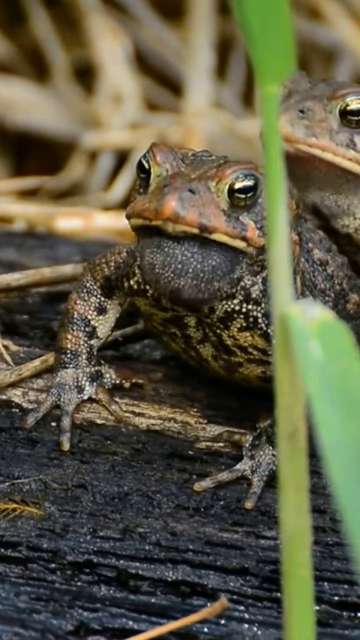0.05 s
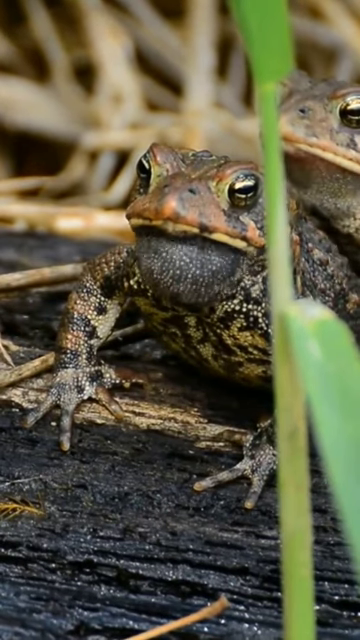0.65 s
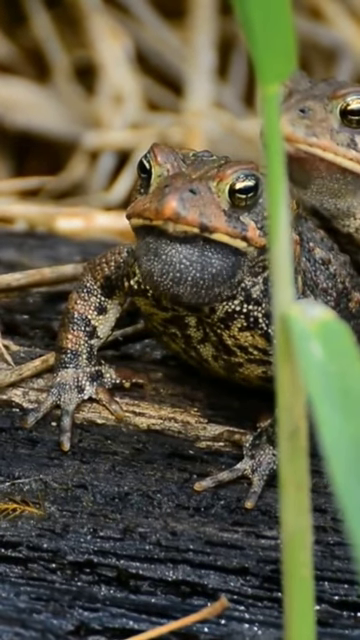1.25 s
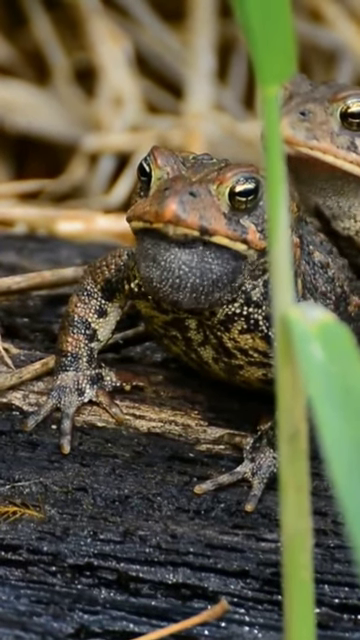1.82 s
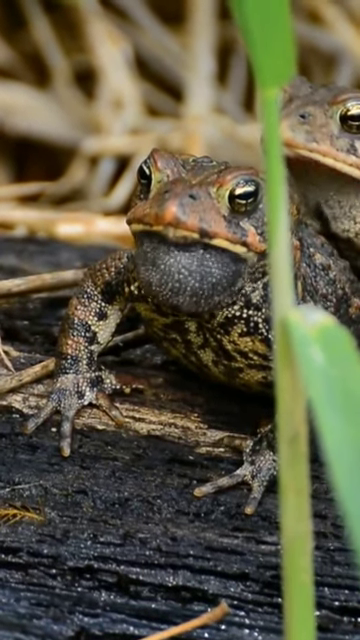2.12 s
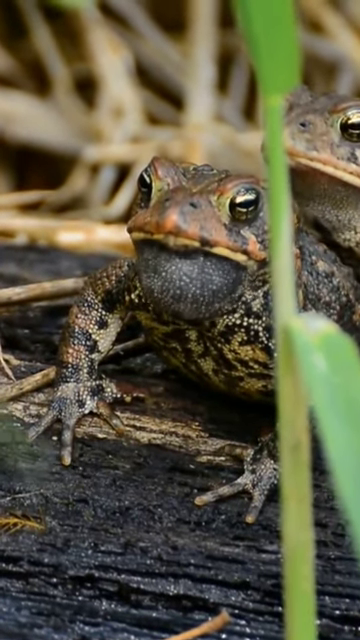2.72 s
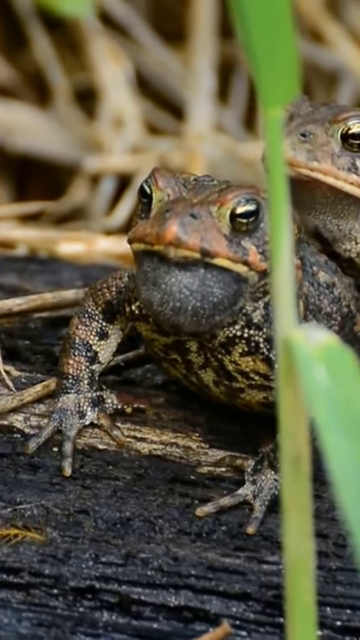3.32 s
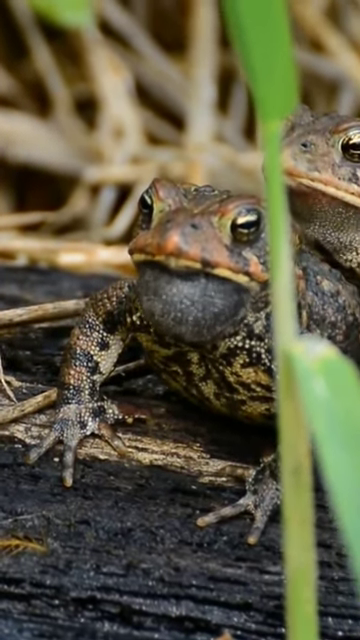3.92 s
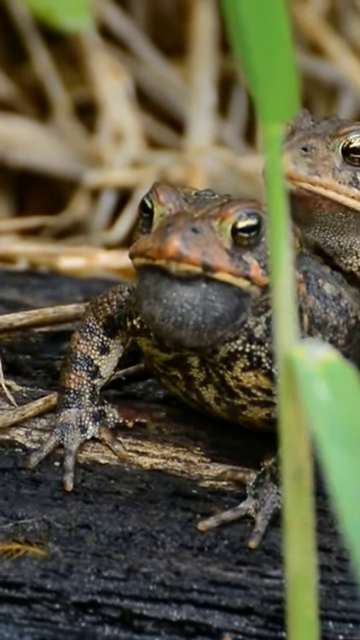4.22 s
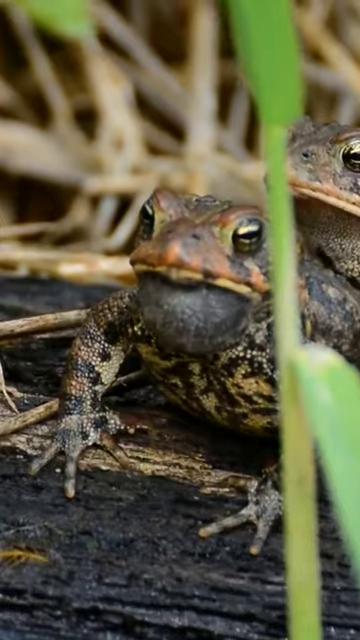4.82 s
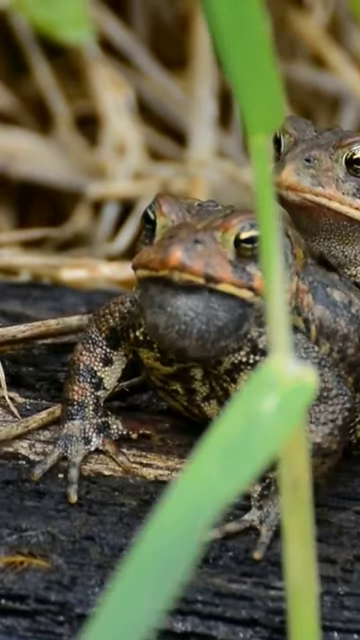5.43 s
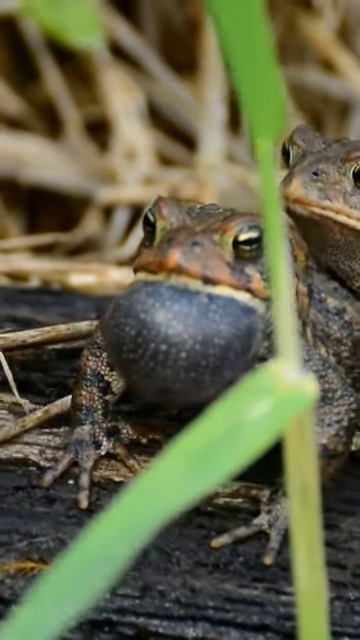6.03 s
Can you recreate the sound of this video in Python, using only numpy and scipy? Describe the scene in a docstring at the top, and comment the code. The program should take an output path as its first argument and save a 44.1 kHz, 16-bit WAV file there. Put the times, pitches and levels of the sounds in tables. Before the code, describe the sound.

Two toads trill together right by the microphone at a pond's edge, in fast, whistling pulses over a soft hiss and a faint distant chorus. The lower one drops out early with a short stutter, while the other carries on, wavering a little before it stops. Wind grows from light puffs to heavy, low buffets that sometimes make the microphone click. Finally a fresh trill climbs in pitch and loudness.

```python
"""Toads trilling in the wind

Two toads call from a log at a pond's edge, very close, each puff of air setting the larynx whistling.
One holds a long trill; a lower neighbour trills along, stops, stutters and finally swells into a new call.
A rising, gusty wind buffets the two microphone ports and now and then overloads them.
A faint chorus and a soft hiss lie far behind."""
import sys
import numpy as np
from scipy import signal
from scipy.fft import rfft, irfft, next_fast_len
from scipy.io import wavfile

SR = 44100
rng = np.random.default_rng(int(sys.argv[2]) if len(sys.argv) > 2 else 0)


def to_wav(s):
    """Save 16-bit WAV."""
    ch = np.atleast_2d(s).T  # columns
    pcm = np.round(np.clip(ch, -1, 1) * 32767)  # PCM
    wavfile.write(sys.argv[1], SR, pcm.astype(np.int16))


N = 271656
TIME = np.arange(N) / SR
LEFT_RIGHT = np.array([[1], [-1]])


# the lead holds steady, hurries twice and runs down: (time [s], pulse rate [Hz])
LONG_RATE = [(0, 41.8), (.25, 41.9), (.38, 40.72), (1.77, 39.54), (2.26, 37.39), (2.54, 38.26),
             (2.96, 44.94), (3.08, 44.34), (3.44, 37.22), (3.9, 34.74), (4.1, 35.82), (4.31, 41.27),
             (4.49, 35.34), (4.66, 33.69), (4.73, 22.28)]
# its pitch sinks slowly, then drops as the air runs out: (time [s], pitch [Hz])
LONG_PITCH = [(0, 1966), (.5, 1958), (3, 1945), (3.35, 1955), (3.8, 1934), (4.6, 1940), (4.73, 1911)]
# its level falters three times: (time [s], level [dB])
LONG_LEVEL = [(0, -6), (1.1, -5), (1.7, -5), (2, -4), (2.8, -4.5), (3, -5.6), (3.15, -5.5), (3.21, -8.5),
              (3.36, -5), (3.57, -4.5), (3.64, -7.5), (3.79, -4), (3.98, -8), (4.2, -8), (4.5, -5),
              (4.73, -3.5)]
# larynx overtones, and rasp from unevenly vibrating membranes: (frequency [x pitch], level [dB])
LONG_OVERTONES = [(2, -34), (3, -44), (3.5, -65.5), (6.5, -62)]
LONG_RASP = [(0.522, -40.5), (0.778, -34), (1.468, -32), (2.492, -48.5), (2.799, -49)]
# the voice smooths out in its second half: (time [s], rasp trim [dB])
LONG_RASP_TRIM = [(0, 0.5), (2.5, 1), (3.1, -0.5), (4.6, -2.5)]


def long_trill():
    """The lead toad spends one breath on a long run of short, even pulses."""
    return trill((.0004, 4.745), *contour(LONG_RATE), *contour(LONG_PITCH), *contour(LONG_LEVEL),
                 LONG_OVERTONES, LONG_RASP, length_s=.014, rise=.28, fall=.3, droop=.55, crest=.42,
                 sag=.105, sac_hold=.6, uneven_db=.46, rasp_trim=LONG_RASP_TRIM)


# the neighbour keeps almost in step with the lead: (time [s], pulse rate [Hz])
NEIGHBOUR_RATE = [(0, 41.22), (1.15, 40.45), (1.42, 37.08), (1.66, 40.26)]
# it sits lower and softer: (time [s], pitch [Hz], level [dB])
NEIGHBOUR_TRILL = [(0, 1806, -11), (.9, 1814, -10), (1.4, 1800, -11.5), (1.66, 1818, -9)]
# its stutter: (time [s], pulse rate [Hz], pitch [Hz], level [dB])
NEIGHBOUR_STUTTER = [(1.835, 23.5, 1490, -19.5), (1.87, 24, 1480, -24), (1.88, 34.3, 1540, -17),
                     (1.92, 39.7, 1700, -12), (2.02, 39.3, 1710, -12), (2.1, 33.7, 1720, -17),
                     (2.15, 45.5, 1712, -12.5)]
# each call's overtones and the rasp they share: (frequency [x pitch], level [dB])
NEIGHBOUR_OVERTONES = [(2, -38.5), (3, -46.5)]
STUTTER_OVERTONES = [(2, -41), (3, -33)]
NEIGHBOUR_RASP = [(.6, -39), (0.799, -25.5), (1.498, -43.5)]


def neighbour_calls():
    """The lower toad trills along in longer pulses, stops, then stutters briefly."""
    along = trill((.0181, 1.672), *contour(NEIGHBOUR_RATE), *contour(NEIGHBOUR_TRILL),
                  NEIGHBOUR_OVERTONES, NEIGHBOUR_RASP, length_s=.018, rise=.47, fall=.21, droop=.86,
                  crest=.53, sag=.14, sac_hold=.25, uneven_db=1.1, jitter_s=.00016)
    stutter = trill((1.8353, 2.16), *contour(NEIGHBOUR_STUTTER), STUTTER_OVERTONES, NEIGHBOUR_RASP,
                    length_s=.022, rise=.45, fall=.5, droop=.1, crest=.39,
                    sag=.14, sac_hold=.25, uneven_db=1, stand_out=-.8)
    return along + stutter


# the closing crescendo: (time [s], pulse rate [Hz], pitch [Hz], level [dB])
NEIGHBOUR_SWELL = [(5.757, 39, 1540, -28.5), (5.86, 38.64, 1650, -19.5), (5.96, 40.77, 1827, -8.5),
                   (6.05, 40.78, 1898, -3.5), (6.13, 39.92, 1899, -4.5), (6.16, 40.5, 1907, -6)]
# its overtones and rasp: (frequency [x pitch], level [dB])
SWELL_OVERTONES = [(1.99, -29)]
SWELL_RASP = [(1.552, -41), (2.58, -47.5)]


def neighbour_swell():
    """The neighbour starts afresh, climbing in pitch and level on deeply arched pulses."""
    return trill((5.757, 6.16), *contour(NEIGHBOUR_SWELL), SWELL_OVERTONES, SWELL_RASP,
                 length_s=.017, rise=.26, fall=.59, droop=.2, crest=.42,
                 sag=.34, sac_hold=.52, uneven_db=.56)


# breath rushing through the open larynx: (frequency [Hz], relative density [dB])
AIR_RUSH = [(300, -33), (650, -7), (950, 6.5), (1400, -2), (2500, 3), (3200, -6.5), (4300, -13),
            (6000, -26.5), (8000, -31.5), (15000, -42)]


def trill(span_s, rate, pitch, level, overtones, rasp, length_s, rise, fall, droop, crest, sag, sac_hold,
          uneven_db, stand_out=.51, jitter_s=.0001, rasp_trim=((0, 0),), rasp_spread_db=3, rush_db=-39):
    """Each puff of air sets the larynx whistling; its pitch arches as the pressure builds and fades."""
    count = np.cumsum(rate) / SR
    times = np.interp(np.arange(*np.interp(span_s, TIME, count)), count, TIME)
    usual_rate = np.median(np.interp(times, TIME, rate))
    out, rush = np.zeros(N), from_db(rush_db) * coloured(AIR_RUSH)[0]
    wanders = np.cumsum(rng.normal(0, .078, (len(times), len(rasp), SR // 30)), axis=2)
    for k, when in enumerate(times):
        chance = rng.standard_normal(5)
        hz, db = np.interp(when, TIME, pitch), np.interp(when, TIME, level)
        # pulses shorten as the rate climbs
        stretch = min((usual_rate / np.interp(when, TIME, rate)) ** .9, 1.08)
        size = min(int(length_s * stretch * SR * (1 + .03 * chance[0])), wanders.shape[2])
        progress = np.linspace(0, 1, size)  # rise, fall and crest are shares of the pulse
        opening = ease(progress / rise) * ease((1 - progress) / fall)
        pressure = opening * (1 - droop * (progress - crest))
        slack = sag * (1 + .077 * chance[4]) * (2 * (progress - crest)) ** 2
        step = 2 * np.pi * hz * (1 + .0029 * chance[1]) / SR
        larynx = np.cumsum(step * (1 - slack))
        # the resonant vocal sac holds back part of the fundamental's sag
        sac = np.cumsum(step * (1 - slack * (1 - sac_hold)))
        tone = pressure * np.sin(sac - sac[size // 2])
        # overtones last through the edges; a positive stand_out lifts them in weak pulses
        for multiple, overtone_db in overtones:
            gain = from_db(overtone_db + rng.normal(0, .4) - stand_out * (db - level.max()))
            tone += gain * np.sqrt(opening) * np.sin(multiple * (larynx - larynx[size // 2]))
        # rasp flares at mid-pulse, at a steady pitch with a wandering phase
        flare = from_db(np.interp(when, *np.transpose(rasp_trim))) * np.sin(np.pi * progress) ** 2
        for (multiple, rasp_db), wander in zip(rasp, wanders[k]):
            gain = from_db(rasp_db + rng.normal(0, rasp_spread_db))
            tone += gain * flare * np.sin(multiple * step * np.arange(size) + wander[:size])
        tone += np.sqrt(opening) * rush[k * size:][:size]
        add(out, when + jitter_s * chance[2], from_db(db + uneven_db * chance[3]) * tone)
    return out


# the breeze between gusts: (time [s], force [dB])
BREEZE = [(0, -56), (.4, -41), (1.4, -50.5), (1.95, -36.5), (2.3, -32.5), (2.95, -28), (3.75, -27),
          (4.3, -27), (4.58, -34.5), (4.8, -27.5), (5.65, -21.5), (6.16, -27)]
# gusts riding on it: (start [s], length [s], force [dB], left minus right [dB])
GUSTS = [(0.242, .11, -38.5, -9), (0.469, 0.059, -34.5, -7), (0.643, 0.089, -41.5, -15.5),
         (0.871, 0.055, -35, -10.5), (1.067, 0.28, -37, -7), (1.469, 0.083, -37.5, -9),
         (1.671, 0.19, -33.5, -8.5), (2.04, 0.13, -32.5, -8), (2.448, .31, -25, -2),
         (2.868, 0.021, -18, 0.5), (2.974, 0.064, -20.5, -0.5), (3.172, 0.33, -21.5, -4.5),
         (3.584, 0.064, -18.5, -6), (3.847, 0.39, -21, 0), (4.631, 0.16, -24, -2.5),
         (4.86, 0.061, -19.5, -4.5), (4.982, .1, -23, -7), (5.131, 0.46, -18, -5), (5.716, 0.089, -18, -4),
         (5.842, .11, -21, -8), (6.021, 0.032, -17, -0.5), (6.123, 0.034, -18, -9.5)]


def wind_force(breeze_pan_db=-5, attack_s=.0089, release_s=.014, sag_db_per_s=8.5):
    """Force at each port in dB: gusts rise, sag and let go on top of the breeze."""
    power = from_db(contour(BREEZE)[0] + breeze_pan_db / 2 * LEFT_RIGHT) ** 2
    for start, length, db, pan_db in GUSTS:
        shape = ease((TIME - start) / attack_s + .5) * ease((start + length - TIME) / release_s + .5)
        sag_db = sag_db_per_s * np.clip(TIME - start - length / 2, -length, length)
        power += (shape * from_db(db + pan_db / 2 * LEFT_RIGHT - sag_db)) ** 2
    return 10 * np.log10(power)


# the body of a moderate wind: (frequency [Hz], relative density [dB])
WIND_COLOUR = [(25, -36.5), (50, -27.5), (70, -17.5), (100, -3.5), (150, 0.5), (200, 2.5), (300, 0.5),
               (450, -4.5), (700, -15.5), (1000, -23.5), (1400, -29.5), (2000, -42.5), (4000, -69.5)]


def wind(force_db, moderate_db=-26.5, split_hz=406):
    """Turbulence comes in lumps, different at each port; the harder it blows, the brighter it gets."""
    churn = [.75 * drift(30) + 1.06 * drift(100) for port in range(2)]
    lumps = unit_rms(from_db(5 * np.clip(churn, -2.5, 1.6)))
    noise = coloured(WIND_COLOUR)
    lows = signal.sosfiltfilt(signal.butter(2, split_hz, fs=SR, output="sos"), noise)
    tilt_db = .68 * (force_db - moderate_db)
    rumble = lows * from_db(-.65 * np.maximum(tilt_db, -3))
    roar = (noise - lows) * from_db(tilt_db - 1.5) * lumps ** .68
    return from_db(force_db) * lumps * (rumble + roar)


def lesser_eddies(force_db, per_s=30, over_db=11, lean=12, count=400):
    """Random eddies, each leaning to one port and following the force there: rows like BUFFETS."""
    times = rng.exponential(1, count).cumsum() / per_s
    ports = rng.integers(0, 2, count)
    spread_db = np.minimum(rng.standard_normal(count), 1.5)
    return [(s, force_db[port, int(s * SR)] + over_db + db, lean * (1 - 2 * port))
            for s, port, db in zip(times, ports, spread_db) if s < TIME[-1]]


# eddies that stand out as thumps: (time [s], force [dB], leftward lean [steps of 1.5 dB])
BUFFETS = [(.2503, -15, -18), (.503, -12.5, -1.5), (.6677, -16, -13), (.895, -12, -16), (1.1102, -15, -17),
           (1.1736, -13.5, -15), (1.2986, -14.5, -11), (1.7523, -26, 5), (2.0524, -8, -7),
           (2.1515, -5.5, -15), (2.875, -11.5, -17), (2.9802, -6.5, -15), (2.9928, -2.5, 14),
           (3.1947, -5.5, -6), (3.2395, -5.5, -13), (3.5904, -9, -14), (3.6273, -1.2, -24),
           (3.8712, -1, -5), (3.8849, 1, -13), (3.9449, -2.5, -10.5), (4.1814, 2.5, 6), (4.2082, -4.5, -12),
           (4.7411, -1, -7), (4.8815, -4.5, 24.5), (5.0627, -0.5, -6), (5.078, 3.5, -20), (5.1749, 11, -12),
           (5.1959, 8, -23), (5.2516, 13, -23), (5.3336, 1, -11), (5.3724, -4, -15), (5.4021, -10, -6),
           (5.451, 5, 0), (5.4927, 2, 10), (5.5697, 1.5, -1.5), (5.7185, 1.5, -9), (5.9357, -1, -8),
           (6.1393, -1.5, -19)]


def buffets(force_db, hz_at_0_db=575, db_per_octave=14, cycles=.7, ragged=.29, saturation_db=-1):
    """Each eddy gives one short swing of pressure, different at each port; harder ones are quicker."""
    out, t = np.zeros((2, N)), np.arange(-400, 401) / SR
    for s, db, lean in BUFFETS + lesser_eddies(force_db):
        hz = hz_at_0_db * 2 ** (max(db, -24) / db_per_octave)
        swing = np.sin(2 * np.pi * hz * t + rng.uniform(0, 2 * np.pi, (2, 1)))
        swing += ragged * unit_rms(filtered(rng.standard_normal((2, len(t))), [hz / 2, hz * 1.2], "band"))
        lee_db = 1.5 * np.minimum(lean * LEFT_RIGHT, 0)
        envelope = np.exp(-(t * hz / cycles) ** 2)
        add(out, s, from_db(min(db, saturation_db) + lee_db) * swing * envelope)
    return out


# microphone overload clicks: (time [s], peak [dB], left minus right [dB])
OVERLOAD_CLICKS = [(3.5892, -24, -15), (3.8623, -21, -9), (3.8704, -21, -11), (5.1935, -25, -10),
                   (5.249, -30, -10), (5.45, -19, 3), (5.566, -28, -5.5), (5.718, -28, -11),
                   (5.936, -22, -10)]


def overload_clicks(decay_s=.0005, dull_hz=2600):
    """Short, sharp clicks as hard wind buffets overload the microphone."""
    out, t = np.zeros((2, N)), np.arange(-200, 201) / SR
    for s, db, pan_db in OVERLOAD_CLICKS:
        burst = rng.standard_normal(len(t)) * np.exp(-np.abs(t) / decay_s)
        click = filtered(burst, dull_hz, "low") + .079 * burst
        add(out, s, from_db(db + pan_db / 2 * LEFT_RIGHT) * click / np.abs(click).max())
    return out


# early reflections: (delay [s], level [dB])
ECHOES = [(.0042, -32.5), (.013, -25.5), (.019, -34.5)]


def echoes(voices):
    """The log and the reeds throw back faint, quick copies of the calls."""
    return sum(from_db(db) * np.interp(TIME - delay, TIME, voices, left=0) for delay, db in ECHOES)


def reeds(x, t60_s, width):
    """Diffuse scatter from the bank: a dying noise tail, partly shared by both ports."""
    t = np.arange(SR // 2) / SR
    mid, side = rng.standard_normal((2, len(t))) * from_db(-60 * t / t60_s)
    tail = (mid + width * side * LEFT_RIGHT) / np.linalg.norm(mid)
    return signal.fftconvolve(x[None], tail, axes=1)[:, :N]


# the backdrop of toads: (pitch [Hz], pulse rate [Hz])
FAR_TOADS = [(1600, 59), (1700, 62), (1790, 50), (1880, 13), (1960, 70), (2030, 38)]


def far_chorus():
    """Distant toads, each with its own wandering pitch and pulse rate."""
    out = 0
    for hz, rate in FAR_TOADS:
        gate = np.maximum(np.sin(2 * np.pi * np.cumsum(rate * (1 + .04 * drift(2))) / SR), 0)
        out += gate * np.sin(2 * np.pi * np.cumsum(hz * (1 + .02 * drift(30))) / SR)
    return unit_rms(out)


# the noise bed's tone: (frequency [Hz], relative density [dB])
HISS_COLOUR = [(25, 12.5), (65, 32), (120, 31.5), (250, 9), (650, 11), (950, 12), (2500, 3.5), (4500, 5.5),
               (7000, 4.5), (15000, 3)]
# its level, swelling as the reeds rustle: (time [s], level [dB])
HISS_LEVEL = [(0, -52.5), (1.6, -54), (2.6, -53), (3.8, -52), (4.1, -54), (4.65, -45), (4.82, -49.5),
              (5.15, -47.5), (5.6, -50), (6.1, -46.5)]


def hiss():
    """A wide bed of hiss with a faint low rumble."""
    mid, side = coloured(HISS_COLOUR)
    return from_db(contour(HISS_LEVEL)[0]) * unit_rms(mid + .73 * side * LEFT_RIGHT)


def from_db(db):
    """Decibels to gain."""
    return 10 ** (np.asarray(db) / 20)


def unit_rms(x):
    """Scale to rms 1."""
    return x / np.sqrt(np.mean(x ** 2) + 1e-20)


def ease(x):
    """Smooth fade from 0 to 1."""
    return np.sin(np.pi / 2 * np.clip(x, 0, 1)) ** 2


def contour(rows):
    """One automation curve for each column after the time."""
    s, *columns = np.transpose(rows)
    return [np.interp(TIME, s, column) for column in columns]


def drift(hz):
    """Smooth random modulation of spread 1, rolling off above hz."""
    pole = np.exp(-40 * np.pi * hz / SR)
    noise = rng.standard_normal(N // 20 + 4002)
    slow = signal.lfilter([1], [1, -2 * pole, pole * pole], noise)[4000:]
    return np.interp(np.arange(N) / 20, np.arange(len(slow)), unit_rms(slow))


def filtered(x, hz, kind):
    """Second-order Butterworth filter."""
    return signal.sosfilt(signal.butter(2, hz, kind, fs=SR, output="sos"), x)


def coloured(spectrum):
    """Two unrelated noises with the given spectrum, rms 1."""
    size = next_fast_len(N)
    freqs, levels = np.transpose(spectrum)
    hz = np.maximum(np.fft.rfftfreq(size, 1 / SR), 1)
    gain = from_db(np.interp(np.log(hz), np.log(freqs), levels))
    return unit_rms(irfft(rfft(rng.standard_normal((2, size))) * gain)[:, :N])


def add(track, s, sound):
    """Mix a sound into a track, centred on time s."""
    at = round(s * SR) - sound.shape[-1] // 2 + np.arange(sound.shape[-1])
    inside = (at >= 0) & (at < N)
    track[..., at[inside]] += sound[..., inside]


def scene():
    """The mix: two toads up front, their reflections, chorus and hiss behind, wind on the ports."""
    lead, neighbour, swell = long_trill(), neighbour_calls(), neighbour_swell()
    voices = lead + neighbour + swell
    toads = (lead * from_db([[-.75], [-.15]]) + neighbour * from_db([[-.6], [-.4]])
             + swell * from_db([[-.4], [.4]]))
    # thin stems scatter the overtones more than the fundamental
    brightened = voices + 1.5 * filtered(voices, [2600, 6000], "band")
    scatter = from_db(-18.5) * reeds(brightened, t60_s=.54, width=.57)
    background = from_db(-42) * reeds(far_chorus(), t60_s=.11, width=.6) + hiss()
    force_db = wind_force()
    air = from_db(.26) * wind(force_db) + overload_clicks() + from_db(-3.5) * buffets(force_db)
    return toads + echoes(voices) + scatter + background + air


def record(dry):
    """The microphone sheds deep bass, the hardest buffets clip at full scale, the top is cut."""
    clipped = np.clip(filtered(dry, 62, "high"), -1, 1)
    return signal.sosfilt(signal.cheby2(16, 70, 16600, fs=SR, output="sos"), clipped)


dry = scene()
out = record(dry)
to_wav(out)
```